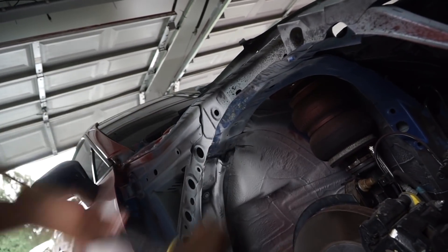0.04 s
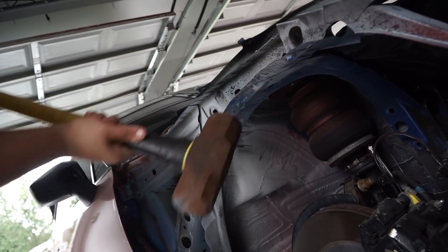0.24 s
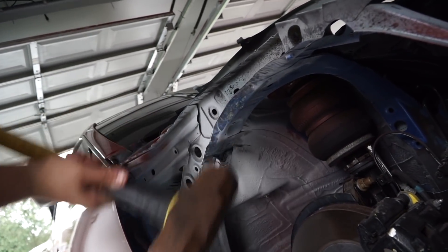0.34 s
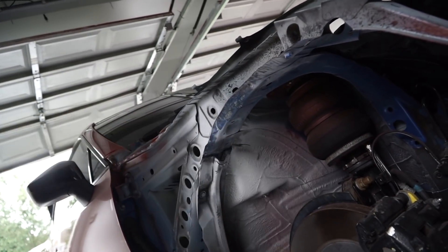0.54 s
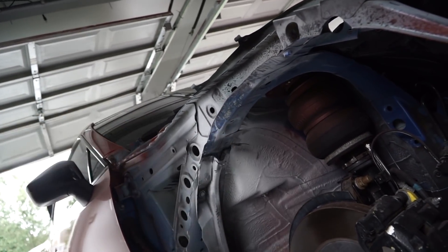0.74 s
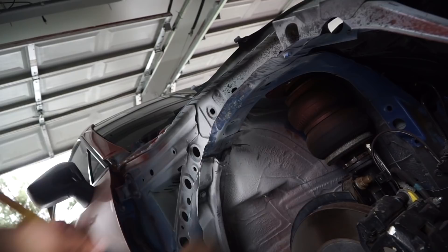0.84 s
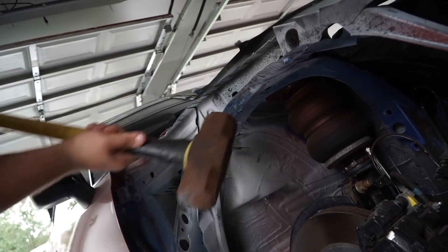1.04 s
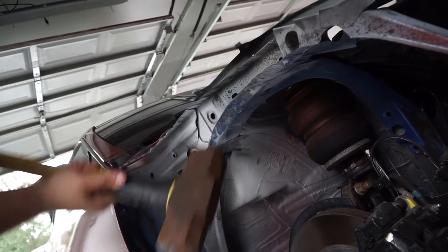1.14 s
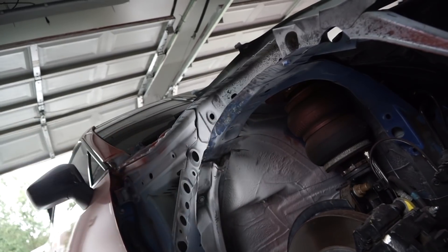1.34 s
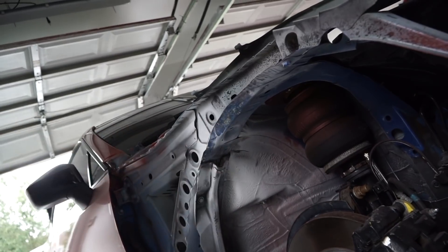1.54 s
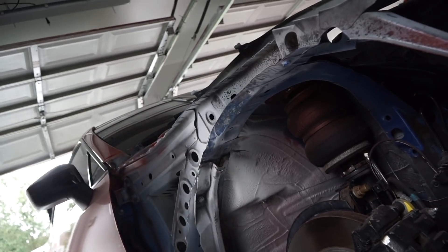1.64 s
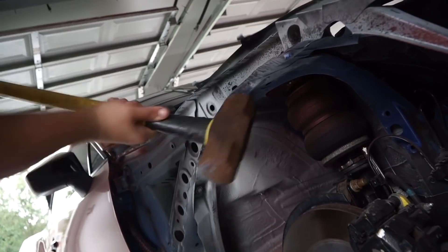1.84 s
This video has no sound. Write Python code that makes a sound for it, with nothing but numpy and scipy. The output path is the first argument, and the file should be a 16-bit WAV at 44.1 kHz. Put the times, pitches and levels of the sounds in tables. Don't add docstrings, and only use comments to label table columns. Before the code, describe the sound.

Heavy hammer blows clang on a hollow steel car body, ringing briefly, with the frame squeaking after

```python
import sys
import numpy as np
from scipy import signal
from scipy.io import wavfile

SR = 44100
rng = np.random.default_rng(int(sys.argv[2]) if len(sys.argv) > 2 else 0)


def makeup_ratio(level_db):
    decades = np.asarray(level_db, float) / 20
    return 10 ** decades


def generate_wav(sig):
    pcm = np.round(np.clip(np.atleast_2d(sig).T, -1, 1) * 32767).astype(np.int16)
    wavfile.write(sys.argv[1], SR, pcm)


N = 83790
T = np.arange(N) / SR
RING_T = np.arange(int(1.15 * SR)) / SR


def rms_one(x):
    return x / np.sqrt(np.mean(x ** 2) + 1e-20)


def at_hz(points, hz):
    table_hz, values = np.array(points).T
    return np.interp(np.log(hz), np.log(table_hz), values)


def drift(rate_hz):
    r = np.exp(-2 * np.pi * rate_hz * 16 / SR)
    white = rng.standard_normal(N // 16 + 602)
    slow = signal.lfilter([1], [1, -2 * r, r * r], white)[600:]
    return np.interp(np.arange(N) / 16, np.arange(len(slow)), rms_one(slow))


def bands(spectrum, white):
    edges = 28 * 2 ** np.arange(0, 9.4, 1 / 3)
    centres = np.sqrt(edges[1:] * edges[:-1])
    power = np.sum(makeup_ratio(2 * at_hz(spectrum, centres)) * np.diff(edges)) / (SR / 2)
    result = []
    for k, hz in enumerate(centres):
        band_pass = signal.butter(2, edges[k:k + 2], "band", fs=SR, output="sos")
        gain = makeup_ratio(at_hz(spectrum, hz)) / np.sqrt(power)
        result.append((hz, gain * signal.sosfilt(band_pass, white[k % 2])))
    return result


def decay(t, t60, rise):
    t = np.maximum(t, 0)
    return (1 - np.exp(-t / rise)) * np.exp(-np.log(1000) * t / t60)


def add(out, s, sound):
    i = int(round(s * SR))
    part = sound[max(-i, 0):N - i]
    out[max(i, 0):max(i, 0) + len(part)] += part


def crack(count):
    crack_hz, width_hz, thud_hz = 1500, 900, 480
    hiss = rng.standard_normal((count, len(RING_T)))
    r = np.exp(-np.pi * width_hz / SR)
    clank = signal.lfilter([1], [1, -2 * r * np.cos(2 * np.pi * crack_hz / SR), r * r], hiss)
    thud = makeup_ratio(-5) * np.sin(2 * np.pi * thud_hz * RING_T)
    body = makeup_ratio(18) * (rms_one(clank) + thud) * decay(RING_T, .035, .0014)
    tick = makeup_ratio(17) * hiss * decay(RING_T - .0004, .007, .00074)
    return body + tick


# (frequency [Hz], rise time [s])
RISE_TIMES = [(60, .03), (90, .05), (130, .006), (300, .006), (1500, .0015), (16000, 0.00056)]
# (frequency [Hz], level struck on flange [dB], level struck on web [dB], t60 [s])
FRAME_MODES = [(88, 2, 1, .45), (120, 1, 1, .4), (160, 5, 7, .2), (248, -8, 2, .45), (305, -12, -1, 0.42),
               (404, -6, -10, .35), (465, -4, -9, .35), (540, -2, -5, .42), (620, -5, -11, .35),
               (690, -8, -11, .35), (930, -13, -12, .42), (1140, -6, -11, .43), (1400, -13, -14, 0.38),
               (2735, -20, -20, 0.37)]


def frame_modes(on_web):
    beat_hz = 6
    ring = np.zeros(len(RING_T))
    for hz, flange_db, web_db, t60 in FRAME_MODES:
        phase, detuning, twin_phase = rng.random(3)
        twin_hz = hz + (beat_hz + .025 * hz) * (.5 + detuning)
        pair = np.sin(2 * np.pi * (hz * RING_T + phase))
        pair += .8 * np.sin(2 * np.pi * (twin_hz * RING_T + twin_phase))
        level_db = 6 + (web_db if on_web else flange_db)
        ring += makeup_ratio(level_db) * pair * decay(RING_T, t60, at_hz(RISE_TIMES, hz))
    return ring


# (frequency [Hz], level per Hz [dB])
PANEL_SPECTRUM = [(24, -56), (40, -21.5), (91, 1.5), (353, -6), (539, -4.5), (825, -8.5), (1170, -9.5),
                  (3800, -24.5), (15800, -57)]
# (frequency [Hz], t60 [s])
PANEL_DECAY = [(50, 0.39), (120, 0.43), (500, 0.42), (1500, 0.4), (4000, 0.47), (9000, 0.39), (16000, 0.27)]
# (frequency [Hz], level against the ringing [dB])
GARAGE_TAIL = [(60, -25), (300, -28.5), (2000, -29.5), (12000, -29)]


def panel_ringing(low_db, lasting):
    same_each_blow = .6
    common = rng.standard_normal((2, 1, len(RING_T)))
    own = rng.standard_normal((2, len(low_db), len(RING_T)))
    white = np.sqrt(same_each_blow) * common + np.sqrt(1 - same_each_blow) * own
    ring = 0
    for hz, band in bands(PANEL_SPECTRUM, white):
        emphasis_db = low_db / (1 + (np.log(hz / 260) / .3) ** 2)
        t60 = at_hz(PANEL_DECAY, hz) * lasting ** (hz / (hz + 3000))
        direct = decay(RING_T, t60, at_hz(RISE_TIMES, hz))
        garage = makeup_ratio(at_hz(GARAGE_TAIL, hz)) * decay(RING_T, 1.286, .096)
        ring = ring + makeup_ratio(12.5 + emphasis_db) * band * (direct + garage)
    return ring


# (time [s], strength [dB], weight of the 260 Hz panels [dB], treble ring time [share])
HAMMER_BLOWS = [
    (-0.63, -6, 1, 1.01),
    (0.2038, -1.5, -5, 1.02),
    (1.0390, -2.5, 4, .78),
    (1.8995, -27, 0, 1.01),
]


def blows():
    out = np.zeros(N)
    settings = np.array(HAMMER_BLOWS)
    ring = panel_ringing(settings[:, 2:3], settings[:, 3:]) + crack(len(HAMMER_BLOWS))
    for k, (s, db, *_) in enumerate(HAMMER_BLOWS):
        add(out, s, makeup_ratio(db) * (ring[k] + frame_modes(on_web=k % 2 == 0)))
    return out


# (frequency [Hz], level per Hz [dB])
AIR_SPECTRUM = [(15, -34), (25, 0.5), (104, -1), (216, -12.5), (284, -5.5), (352, -31), (1730, -31),
                (2030, -28), (15800, -59)]


def air():
    together = drift(4)
    out = np.zeros(N)
    for hz, band in bands(AIR_SPECTRUM, rng.standard_normal((2, N))):
        lumps_db = .8 * together + 1.6 * drift(12)
        out += band * makeup_ratio(lumps_db * (1.8 if hz < 150 else 1))
    return makeup_ratio(-41) * out


# (start [s], peak [s], end [s], slip rate [Hz], level [dB rms], steady part [share])
FRAME_SQUEAKS = [
    (0, .03, 0.1, 643, -60, 0.5),
    (.53, .63, .85, 753, -41, .3),
    (1.575, 1.71, 1.93, 688, -46.5, .95),
]
# (multiple of slip rate, first squeak [dB], second squeak [dB], third squeak [dB])
SQUEAK_PARTIALS = [(2, -12, -8, -15), (3, 8, 0.5, 4.5), (4.05, -25, 0, -39.5), (5, -18, -17, -11),
                   (5.95, -3.5, -13, -11), (7.3, -10, -8, -24), (8.4, -22, -30, -20)]


def squeaks():
    out = np.zeros(N)
    for k, (start, peak, end, hz, db, steady) in enumerate(FRAME_SQUEAKS):
        shape = np.interp(T, [start - .001, peak, end], [0, 1, 0]) ** 1.3
        wander = .007 * (drift(25) + 2.5 * shape)
        phase = 2 * np.pi * np.cumsum(hz * (1 + wander)) / SR
        for j, (multiple, *partial_db) in enumerate(SQUEAK_PARTIALS):
            slip = .55 * drift(60)
            if j == 1:
                slip += steady * (1 + makeup_ratio(-11) * drift(60))
            out += makeup_ratio(db - .5 + partial_db[k]) * shape * slip * np.sin(multiple * phase)
    return out


# (peak [s], length [s], level [dB rms])
BRUSHES = [(0, 0.079, -46), (0.186, 0.0092, -52.5), (.62, .05, -54), (.76, .05, -54), (1.549, .004, -64),
           (1.70, .06, -54), (1.8, .006, -59)]
# (frequency [Hz], level per Hz [dB])
BRUSH_SPECTRUM = [(290, -20.5), (500, -8), (936, 0.5), (1350, -9), (1910, -17), (4280, -2), (14000, -33)]


def rustles():
    shape = sum(makeup_ratio(db) * np.exp(-np.abs(T - s) / length) for s, length, db in BRUSHES)
    brush = np.zeros(N)
    for hz, band in bands(BRUSH_SPECTRUM, rng.standard_normal((2, N))):
        if hz > 400:
            brush += band * makeup_ratio(1.3 * drift(40))
    return shape * brush


# (start [s], end [s], frequency [Hz], level [dB rms])
STAND_DRONES = [(1.38, 1.95, 275, -50), (.55, 0.96, 177, -48.5), (1.4, 1.95, 190, -48.5),
                (0, .2, 320, -54.5)]


def drones():
    out = np.zeros(N)
    for start, end, hz, db in STAND_DRONES:
        shape = np.clip(np.minimum(T - start, end - T) / .08, 0, 1)
        rough = 1 + .5 * drift(7.2)
        out += makeup_ratio(db + 3) * shape * rough * np.sin(2 * np.pi * hz * T + 1.2 * drift(6))
    return out


# (time [s], level [dB], frequency [Hz])
STAND_KNOCKS = [(.158, -29.5, 92), (0.9, -31, 72), (1.785, -29, 82), (1.9, -34, 70)]


def knocks():
    out = np.zeros(N)
    for s, db, hz in STAND_KNOCKS:
        add(out, s, makeup_ratio(db) * np.sin(2 * np.pi * hz * T) * decay(T, .09, .003))
    return out


# (time [s], level [dB], frequency [Hz])
GRIT_TICKS = [(.8985, -50, 9000), (1.54, -53, 12000), (.68, -54, 8000), (1.795, -54, 7000), (.8, -56, 9500)]


def grit():
    out = np.zeros(N)
    for s, db, hz in GRIT_TICKS:
        add(out, s, makeup_ratio(db) * np.sin(2 * np.pi * hz * T) * decay(T, .006, .0003))
    return out


def scene():
    return (blows() + air() + squeaks() + rustles() + drones() + knocks() + grit())[None]


# (frequency [Hz], width [Hz], level [dB])
MICROPHONE_PEAKS = [(1330, 600, 2.5), (1890, 500, -1.5), (4050, 1520, 4.5), (5570, 2000, -4),
                    (9000, 2000, 4), (13500, 7000, 4)]


def microphone(x):
    for hz, width_hz, db in MICROPHONE_PEAKS:
        a, w = makeup_ratio(db / 2), 2 * np.pi * hz / SR
        q = np.sin(w) * width_hz / hz / 2
        x = signal.lfilter([1 + q * a, -2 * np.cos(w), 1 - q * a], [1 + q / a, -2 * np.cos(w), 1 - q / a], x)
    return x


def roll_off(x):
    return signal.sosfilt(signal.butter(12, 15950, fs=SR, output="sos"), x)


def record(dry):
    overload_db, limit_db, attack_s, release_db_per_s = 14.5, -1.5, .0035, 260
    x = np.clip(microphone(dry), -makeup_ratio(overload_db), makeup_ratio(overload_db))
    level = 20 * np.log10(np.abs(x) + 1e-6)
    release = release_db_per_s * T
    held = np.maximum.accumulate(level + release, axis=1) - release
    r = np.exp(-1 / (attack_s * SR))
    cut_db = signal.lfilter([1 - r], [1, -r], np.maximum(held - limit_db, 0))
    x = np.clip(x * makeup_ratio(-cut_db), -1, 1)
    x = signal.sosfilt(signal.cheby2(10, 50, 16800, fs=SR, output="sos"), x)
    mix = np.clip(x, -1, 1)
    return roll_off(mix)


dry = scene()
out = record(dry)
generate_wav(out)
```